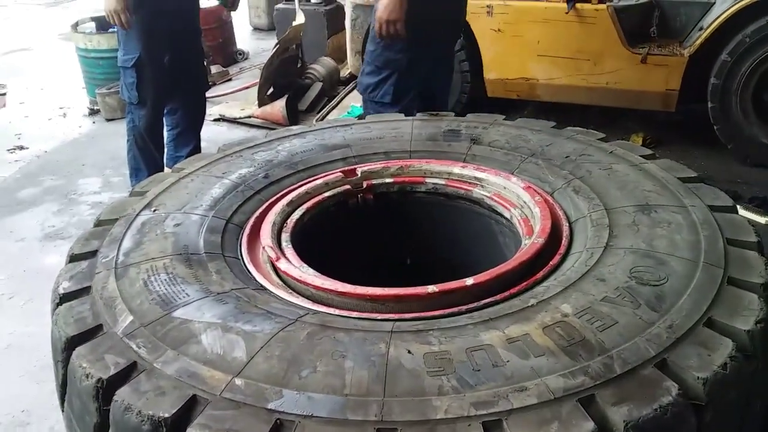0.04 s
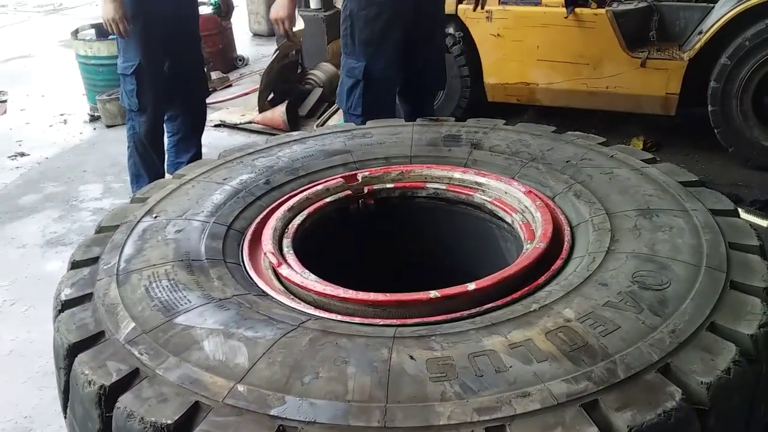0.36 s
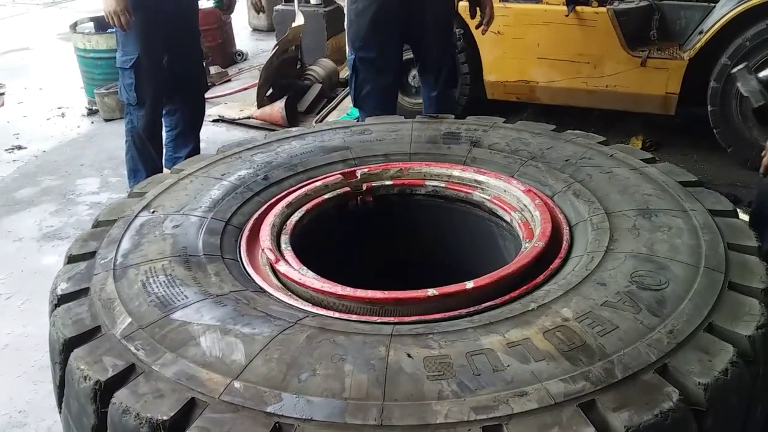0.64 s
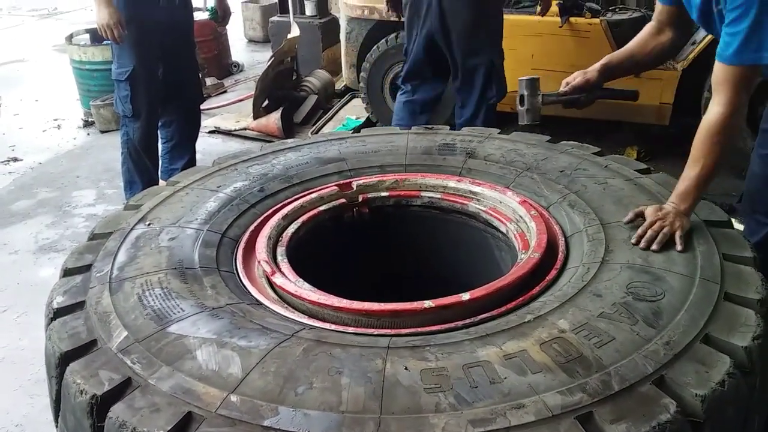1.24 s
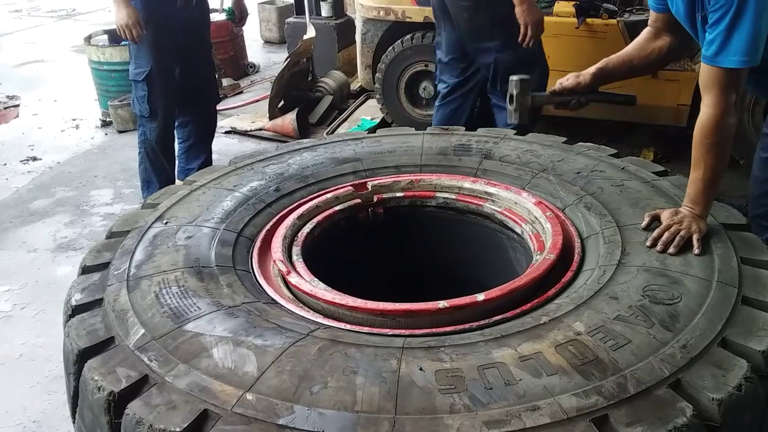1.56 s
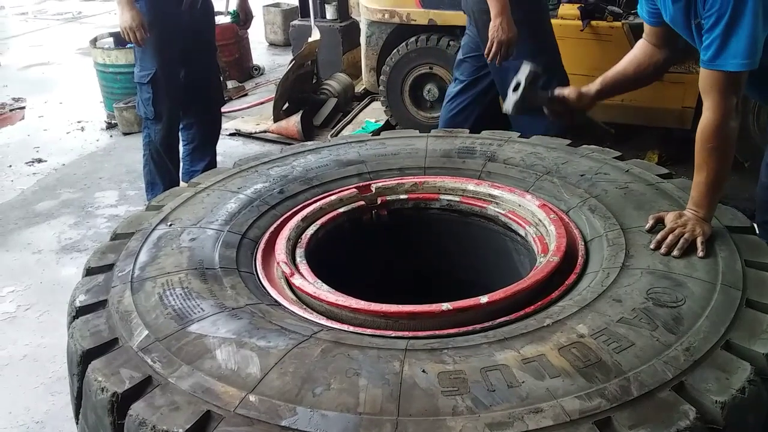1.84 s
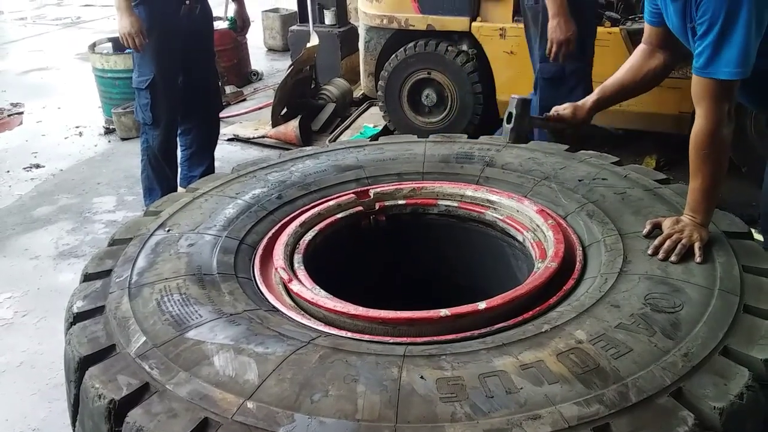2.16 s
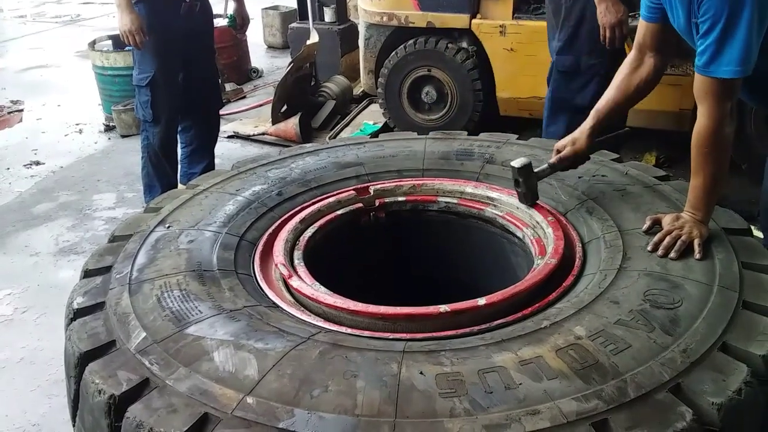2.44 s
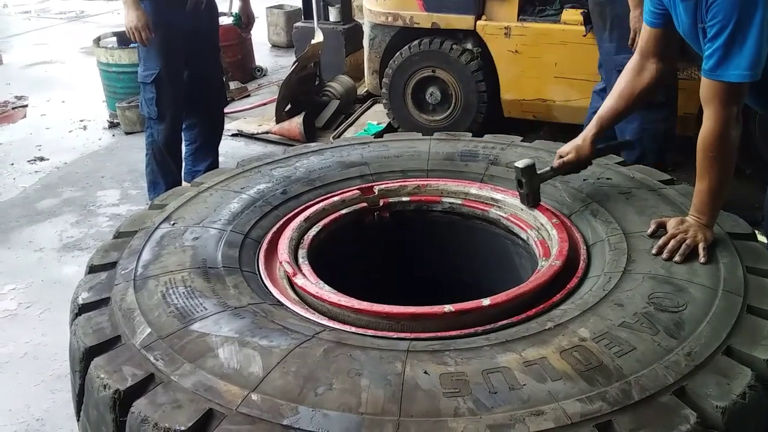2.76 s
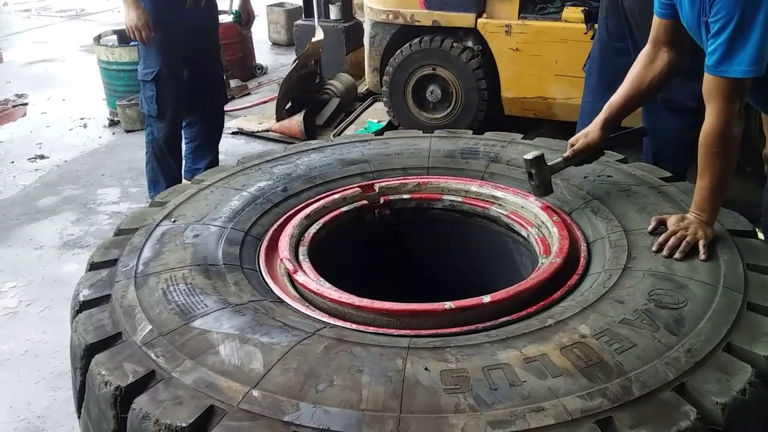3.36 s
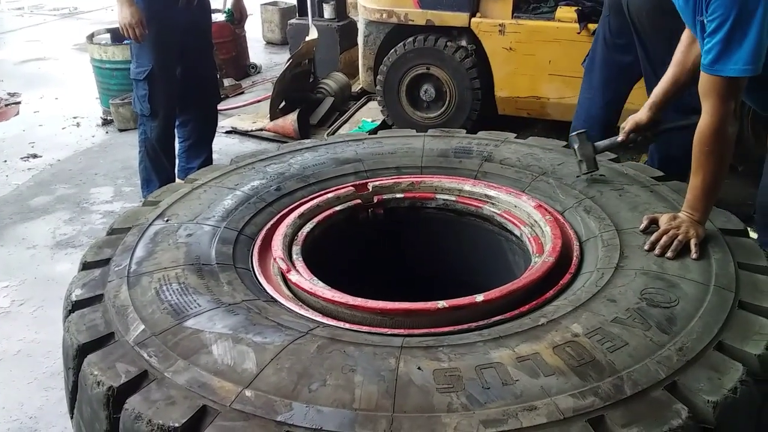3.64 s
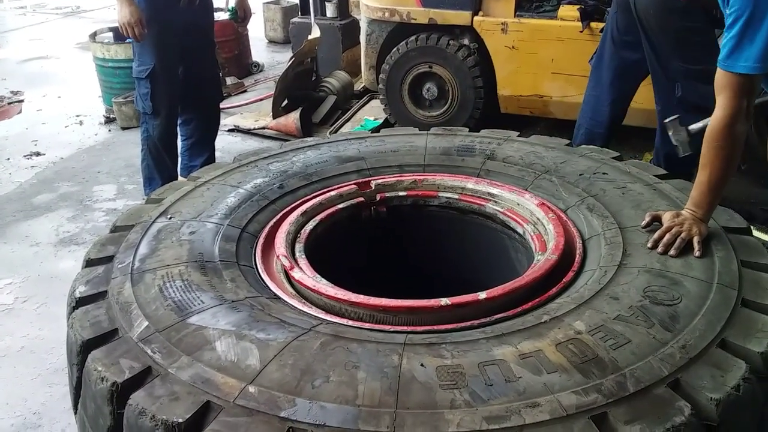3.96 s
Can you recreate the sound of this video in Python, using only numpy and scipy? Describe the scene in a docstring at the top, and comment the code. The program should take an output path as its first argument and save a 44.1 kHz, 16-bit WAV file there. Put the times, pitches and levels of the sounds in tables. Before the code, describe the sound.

Four loud, ringing hammer blows strike a steel tyre rim while a forklift idles.

```python
"""First a forklift's diesel idles in a workshop: each firing thumps, puffs air and rattles a cylinder.
A light knock, two faint squeaks and a soft step follow. Then a sledge hammer hits a huge tyre's steel
rim four times: the rim clangs with many close tones, the tyre booms and a loose lock ring jingles.
The blows overload the recorder, whose gain control turns everything down and keeps it there."""
import sys
import numpy as np
from scipy import signal
from scipy.fft import rfft, irfft, next_fast_len
from scipy.io import wavfile
from scipy.ndimage import uniform_filter1d, minimum_filter1d

SR = 44100
rng = np.random.default_rng(int(sys.argv[2]) if len(sys.argv) > 2 else 0)


def inscribe(sig):
    """Save sig as 16-bit PCM at rate SR to the path in sys.argv[1].

    A 1-D sig is mono; a 2-D sig holds one channel per row.
    Samples are clipped to [-1, 1] before scaling.
    """
    pcm = np.round(np.clip(np.atleast_2d(sig).T, -1, 1) * 32767)
    wavfile.write(sys.argv[1], SR, pcm.astype(np.int16))


N = 176400

# exhaust tones (multiple of the firing rate, level [dB])
EXHAUST_TONES = [(1, -35), (2, -40), (3, -5), (4, -18), (5, 0), (6, 3), (7, 2), (8, -18.5), (9, -8),
                 (10, -5.5), (11, -48.5), (12, -6), (13, -33.5)]
# each cylinder's rattle (level [dB], pitch [Hz])
CYLINDERS = [(-2, 2235), (2.5, 2280), (1, 2200), (2.5, 2085)]
# engine air, cuts that leave room for thump and rattle, swing per firing (pitch [Hz], level [dB])
AIR = [(15, -72), (25, -44), (53, -19.5), (86, -11), (123, -9), (148, 1.5), (285, -9.5), (308, -13.5),
       (361, -13.5), (534, -20.5), (578, -17), (812, -17), (950, -20), (1050, -19), (1440, -19.5),
       (1560, -16), (2080, -7), (2780, -25), (3700, -26.5), (6940, -32.5), (8550, -31.5), (10800, -42.5),
       (13000, -37.5)]
AIR_CUTS = [(50, -7), (110, -7), (170, -8), (300, -1.5), (1500, 0), (2100, -4), (2900, -0.5)]
AIR_SWING = [(100, 1.7), (300, 1), (700, 1.3), (3000, 1), (10000, 0.48)]
# the engine's harder knocks (time [s])
HARD_FIRINGS = [.48, 1.52]
# tone colours of the noisy sounds (pitch [Hz], level [dB])
SQUEAK = [(3000, -50), (3620, -3), (3770, -2), (3920, -14), (4700, -22), (6000, -50)]
SCUFF = [(300, -23), (800, 4), (1500, -3), (3000, -4), (4500, -10), (7000, -25), (12000, -35)]
KNOCK = [(250, -25), (700, 0), (1100, 0), (1600, -16), (6000, -40)]
TYRE_BOOM = [(25, -25), (50, -8), (80, -3), (140, -4), (400, -30)]
THUD = [(25, -24), (45, -21), (70, -4.5), (150, 1), (300, -3), (700, -5.5), (2000, -49)]
CRASH = [(88, -52), (150, -12), (368, -13), (544, -26), (608, 2), (776, -7), (1050, 5.5), (1330, -2.5),
         (1460, 7), (1830, 1), (2330, 4), (2870, 0.5), (3720, 0.5), (5510, -13.5), (8150, -20),
         (9820, -26.5), (13000, -28.5)]  # the rim's first burst, soon damped by the tyre
CLANG = [(150, -34), (250, -17.5), (517, -12), (553, -9.5), (600, -18), (663, -11), (697, -8.5), (782, -10),
         (970, -4), (1310, -6.5), (1520, 1), (1910, -8.5), (2010, -5), (2180, -3), (2620, -4.5),
         (3030, -12.5), (3350, 0), (3820, -6.5), (4020, -7.5), (5590, -20), (6940, -20), (8460, -24),
         (9650, -32), (11400, -31.5), (13000, -37)]  # its many weaker tones, and the workshop's echo
# the rim's clearest tones, and how well they reach the air (pitch [Hz], level [dB])
RIM_TONES = [(559.9, -46.5), (716.0, -49.5), (990.5, -43.5), (1050, -47.5), (1319, -40.5), (1464, -36.5),
             (1550, -35), (1615, -64), (1712, -42.5), (1900, -58.5), (2056, -32.5), (2369, -36),
             (2428, -34), (2552, -33.5), (2600, -33.5), (2686, -45.5), (2724, -34), (2767, -47),
             (2859, -40.5), (3025, -44), (3316, -36.5), (3435, -39.5), (3634, -38), (3666, -39.5),
             (3758, -39.5), (4070, -50.5), (4156, -47.5), (4194, -47), (4500, -41), (4597, -43),
             (4840, -67), (5346, -49), (5954, -53), (6686, -49), (6821, -61), (6934, -73), (7639, -68),
             (8172, -65)]
RIM_COLOUR = [(550, 3), (720, 3.5), (950, -1.5), (2500, -4), (3500, 0.5), (4500, -4.5), (5600, -5.5),
              (6900, 1), (8200, 10.5)]
# how long sounds take to fade by 60 dB, called t60 (pitch [Hz], time [s])
RIM_T60 = [(550, 1.36), (1500, 1), (3500, 0.91), (7000, 0.85)]
CRASH_T60 = [(200, 0.31), (1000, 0.19), (3000, 0.34), (10000, 0.33)]
CLANG_T60 = [(400, 0.82), (1500, 1.03), (3500, 1.07), (6000, 0.73), (12000, 1.13)]
ROOM_T60 = [(300, 1.2), (1500, 1.54), (3500, 1.51), (6000, 1.26), (12000, 0.91)]
# short tones as hammer head meets rim (pitch [Hz], level [dB], t60 [s])
CONTACT_TONES = [(876, -1.5, 0.063), (1186, 1.5, 0.061), (1427, -6.5, 0.15), (1683, 4, 0.051),
                 (2313, -12, 0.32), (2770, -5.5, 0.19), (3035, -6.5, 0.26), (3374, -4, 0.14),
                 (3668, -6, 0.15)]
# the lock ring's tones (pitch [Hz])
JINGLE_HZ = [4550, 4950, 5310, 6010, 6920, 7590, 8210]
# blows; where each lands picks two pings (time [s], strength [dB], brightness [dB per octave],
# thud [dB], first ping [Hz], its level [dB], second ping [Hz], its level [dB])
BLOWS = [(1.981, 1.5, 1, 4.5, 3018, -1, 2340, -8), (2.3906, -0.5, 1, 1, 3015, -8.5, 1735, -10),
         (2.8048, 1, 0.5, 1, 3797, -7, 1482, -8), (3.2154, 0.5, 0, 1, 2777, -5.5, 3677, -10)]
# stereo width (pitch [Hz], side against mid [dB])
WIDTH = [(2800, -47), (3500, -57), (4300, -12), (6000, -3.5), (12000, -4)]

FIRING_HZ, FIRST_FIRING_S = 23.13, 0.006
HAMMER_DB = 17  # added to every part of a blow
TWIN_HZ, TWIN_DB = 4.04, -9  # each rim tone's twin, against that tone
MONO_BELOW_HZ, TOP_HZ = 3000, 13200


def amp(db):
    """Turn decibels into a multiplier."""
    return 10 ** (np.asarray(db) / 20)


def unit(x):
    """Scale x to an average power of 1."""
    return x / np.sqrt(np.mean(x ** 2) + 1e-20)


def along(points, hz):
    """Read a table between its rows, on a musical pitch scale."""
    pitches, values = np.transpose(points)
    return np.interp(np.log(hz + 1), np.log(pitches + 1), values)


def filtered(x, response):
    """Scale each pitch in x by response(hz)."""
    n = x.shape[-1]
    padded = next_fast_len(n + SR // 4)
    return irfft(rfft(x, padded) * response(np.fft.rfftfreq(padded, 1 / SR)), padded)[..., :n]


def noise(colour, n):
    """Two channels of noise with this tone colour."""
    return unit(filtered(rng.standard_normal((2, n)), lambda hz: amp(along(colour, hz))))


def dying(x, t60s):
    """Fade each pitch at its own speed."""
    hz, t, bands = signal.stft(x, SR, nperseg=256)
    fade = amp(-60 * t / along(t60s, hz)[:, None])
    return signal.istft(bands * fade, SR, nperseg=256)[1][:, :x.shape[1]]


def add(out, s, x):
    """Mix x into out from s seconds on."""
    start = max(round(s * SR), 0)
    out[:, start:start + x.shape[1]] += x[:, :N - start]


def ring(tones, t, scatter_db):
    """Struck metal: fading pure tones, a little different at every hit."""
    out = np.zeros((2, len(t)))
    for (hz, db, t60), (size, phase) in zip(tones, rng.standard_normal((len(tones), 2))):
        age = t[t < t60]
        angle = 2 * np.pi * (hz * age + phase)
        fade = amp(db + scatter_db * size - 60 * age / t60)
        out[:, :len(age)] += fade * np.array([np.sin(angle), np.cos(angle)])
    return out


def crowd(bins, colour, n):
    """Many steady tones of random strength, one per given pitch slot (bin)."""
    tones = np.zeros((2, n // 2 + 1), complex)
    tones[:, bins] = rng.standard_normal((2, len(bins))) + 1j * rng.standard_normal((2, len(bins)))
    return unit(irfft(tones * amp(along(colour, np.fft.rfftfreq(n, 1 / SR))), n))


def engine():
    """Every firing thumps in the exhaust, puffs air and rattles its cylinder."""
    cycles = (np.arange(N) / SR - FIRST_FIRING_S) * FIRING_HZ
    firings = np.arange(int(cycles[-1]) + 1)
    chance = rng.standard_normal((len(firings), 3))
    thump = unit(sum(amp(db) * np.cos(2 * np.pi * k * cycles) for k, db in EXHAUST_TONES))
    thump *= amp(-34.5 + 0.78 * np.interp(cycles, firings, chance[:, 0]))
    air = unit(filtered(noise(AIR, N), lambda hz: amp(along(AIR_CUTS, hz))))
    hz, s, bands = signal.stft(air, SR, nperseg=512)
    swing_db = along(AIR_SWING, hz)[:, None] * np.cos(2 * np.pi * (s - FIRST_FIRING_S) * FIRING_HZ)
    puffs = signal.istft(bands * amp(swing_db), SR, nperseg=512)[1][:, :N]
    out = thump + amp(-31.5) * puffs
    t = np.arange(SR // 8) / SR
    width_hz, t60, rise_s, lead_s = 195, 0.14, 0.0055, 0.01  # of each rattle
    for k, (_, size, detune) in zip(firings, chance):
        fired_s = FIRST_FIRING_S + k / FIRING_HZ
        db, centre_hz = CYLINDERS[k % len(CYLINDERS)]
        centre_hz += 40 * detune
        hiss = rng.standard_normal((2, len(t)))
        rattle = unit(filtered(hiss, lambda hz: 1 / (1 + ((hz - centre_hz) / width_hz) ** 2) ** 2))
        hard = any(abs(fired_s - when) < 0.5 / FIRING_HZ for when in HARD_FIRINGS)
        shape = amp(-28.5 + db + 7.5 * hard + size - 60 * t / t60) * (1 - np.exp(-t / rise_s))
        add(out, fired_s - lead_s, shape * rattle)
    return out


def squeaks():
    """Something squeaks thinly in the background, twice."""
    out = np.zeros((2, N))
    for s, length_s, db in [(0.248, 0.077, -41), (0.339, 0.1, -43)]:
        n = int(length_s * SR)
        add(out, s, amp(db) * np.sqrt(np.hanning(n)) * noise(SQUEAK, n))
    return out


def scuff(start_s=1.13, length_s=0.26, db=-36):
    """A soft scuff as someone steps up to the tyre."""
    out, n = np.zeros((2, N)), int(length_s * SR)
    add(out, start_s, amp(db) * np.hanning(n) * noise(SCUFF, n))
    return out


def knock(start_s=0.161, t60=0.08, db=-21):
    """A light, dull knock somewhere in the workshop."""
    out, t = np.zeros((2, N)), np.arange(SR // 4) / SR
    add(out, start_s, amp(db - 60 * t / t60) * noise(KNOCK, len(t)))
    return out


def jingle(n, length_s=0.35, fall_db_per_s=89, t60=0.12, db_per_octave=-6.5):
    """The loose lock ring makes small, fading taps at random, each ringing a few high tones."""
    out, t = np.zeros((2, N)), np.arange(SR // 5) / SR
    for moment, softness, detune in rng.random((12, 3)):
        s = length_s * moment
        tones = [(hz * (0.99 + 0.0199 * detune), db_per_octave * np.log2(hz / JINGLE_HZ[0]), t60)
                 for hz in JINGLE_HZ]
        add(out, s, amp(-22 - fall_db_per_s * s - 7.5 * softness) * ring(tones, t, scatter_db=2.5))
    return out[:, :n]


def rim(bins, t):
    """The steel clangs and the room echoes. The rim is slightly oval, so tones throb against twins."""
    n = len(t)
    clang = amp(-18) * dying(crowd(bins, CLANG, n), CLANG_T60)
    crash = amp(-3) * dying(crowd(bins, CRASH, n), CRASH_T60)
    echo = amp(-20) * dying(noise(CLANG, n), ROOM_T60)
    top_db = max(db for hz, db in RIM_TONES)
    tones = [(hz + gap_hz, db - top_db + gap_db + along(RIM_COLOUR, hz), along(RIM_T60, hz))
             for hz, db in RIM_TONES for gap_hz, gap_db in [(0, 0), (TWIN_HZ, TWIN_DB)]]
    return clang + crash + echo + amp(-21.5) * ring(tones, t, scatter_db=1.5)


def hammer(tone_count=520, ping_t60=0.19, spread_s=0.0022, thud_peak_s=0.013, boom_t60=0.45):
    """Each blow rings the rim, lands with a thud, makes the tyre boom and shakes the lock ring."""
    out, n = np.zeros((2, N)), 2 * SR
    t = np.arange(n) / SR
    crowd_hz = (np.arange(tone_count) + rng.random(tone_count)) / tone_count * TOP_HZ
    bins = (crowd_hz * n / SR).astype(int)  # one rim, so all blows share these pitches
    for s, db, brightness, thud_db, first_hz, first_db, second_hz, second_db in BLOWS:
        steel = rim(bins, t) + amp(-4) * ring(CONTACT_TONES, t, scatter_db=0.5)
        pings = [(first_hz, first_db, ping_t60), (second_hz, second_db, ping_t60)]
        steel += ring(pings, t, scatter_db=3)
        steel = filtered(steel, lambda hz: amp(brightness * np.log2(np.maximum(hz, 300) / 2500)))
        steel *= 1 - np.exp(-t / spread_s)  # the blow spreads around the rim
        rise = t / thud_peak_s
        thud = amp(-15.5 + thud_db) * rise * np.exp((1 - rise ** 2) / 2) * noise(THUD, n)
        boom = amp(-31.5 - 60 * t / boom_t60) * noise(TYRE_BOOM, n)
        add(out, s, amp(HAMMER_DB + db) * (steel + thud + boom + jingle(n)))
    return out


def scene():
    """One channel of the mix is the middle, the other the side; only the treble is wide."""
    mid, other = hammer() + engine() + knock() + squeaks() + scuff()
    side = filtered(other, lambda hz: amp(along(WIDTH, hz)))
    return np.array([mid + side, mid - side])


def smooth(x, seconds):
    """Follow x with a lag."""
    keep = np.exp(-1 / (seconds * SR))
    return signal.lfilter([1 - keep], [1, -keep], x)


def turned_down(x, above_db, max_db, attack_s, release_db_per_s):
    """Gain control cuts the level above a threshold; a negative release keeps deepening the cut."""
    level_db = 10 * np.log10(smooth(np.mean(x ** 2, axis=0), 0.012) + 1e-12)
    excess_db = np.clip(level_db - above_db, 0, max_db)
    release_db = release_db_per_s * np.arange(N) / SR
    held_db = np.maximum.accumulate(excess_db + release_db) - release_db
    return x * amp(-smooth(held_db, attack_s))


def limited(x, ceiling=2.21, look_ahead_s=0.0027):
    """A limiter turns down just ahead of the tallest peaks."""
    window = int(2 * look_ahead_s * SR)
    gain = np.minimum(1, ceiling / (np.abs(x).max(axis=0) + 1e-9))
    return x * uniform_filter1d(minimum_filter1d(gain, window), window)


def record(dry):
    """Turn down slowly and quickly, squash peaks, keep only the treble in stereo and cut the very top."""
    x = turned_down(dry, above_db=-7, max_db=19, attack_s=0.39, release_db_per_s=-0.5)
    x = turned_down(x, above_db=-5, max_db=40, attack_s=0.0054, release_db_per_s=170)
    x = limited(x)
    left, right = x / (1 + np.abs(x).max(axis=0) ** 6) ** (1 / 6)  # soft clipping
    mid = (left + right) / 2
    side = filtered((left - right) / 2, lambda hz: 1 - 1 / (1 + (hz / MONO_BELOW_HZ) ** 20))
    return filtered(np.array([mid + side, mid - side]), lambda hz: hz < TOP_HZ)


dry = scene()
out = record(dry)
inscribe(out)
```